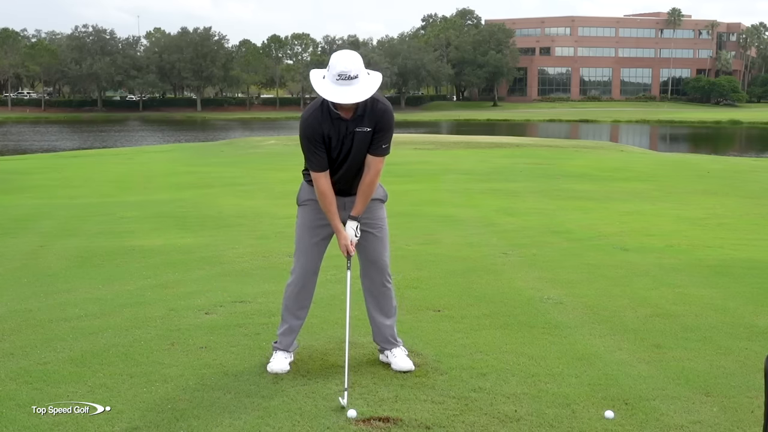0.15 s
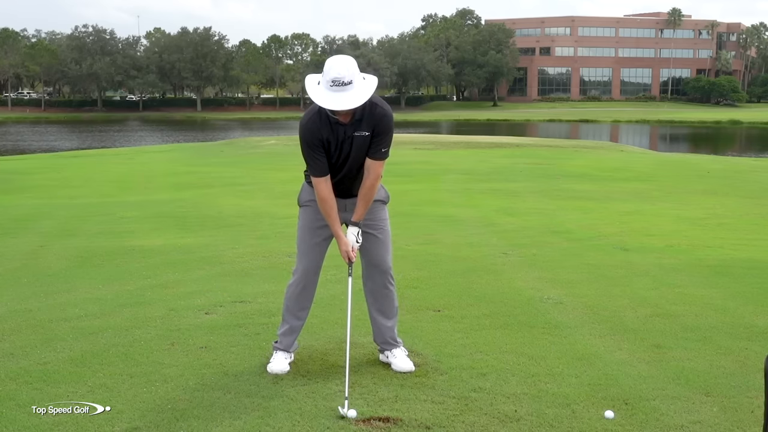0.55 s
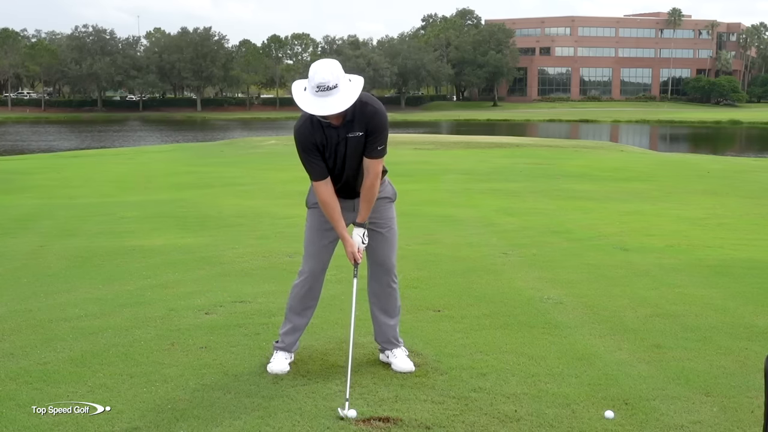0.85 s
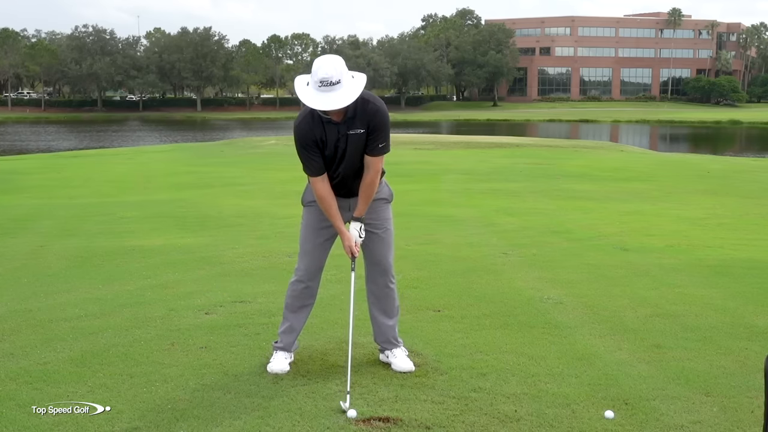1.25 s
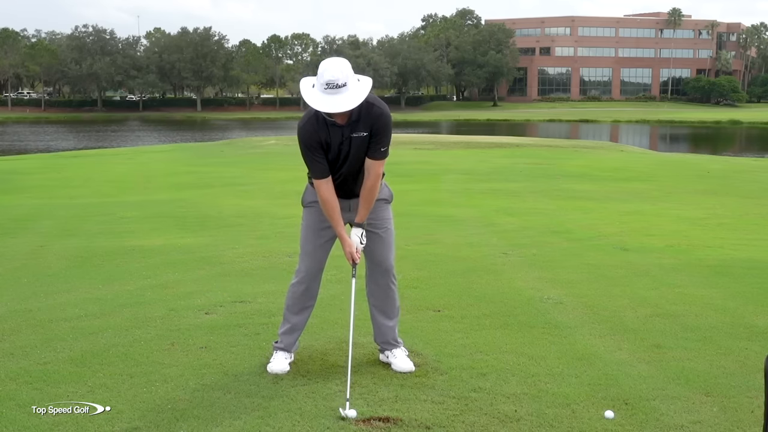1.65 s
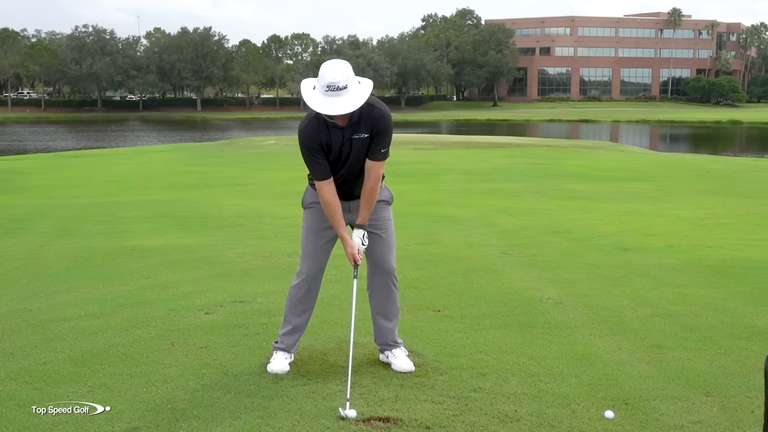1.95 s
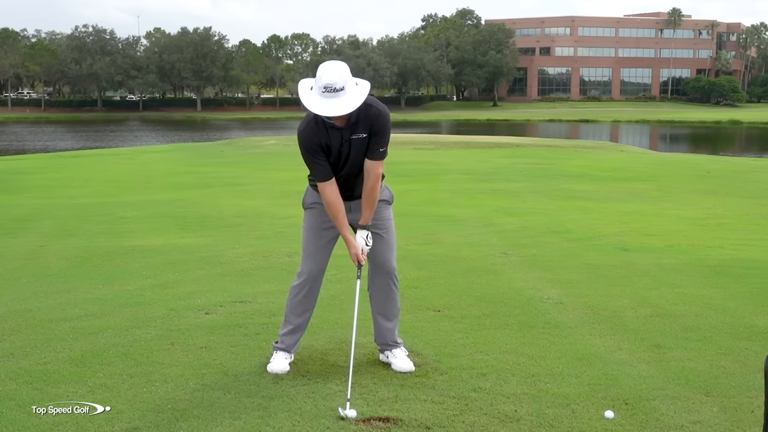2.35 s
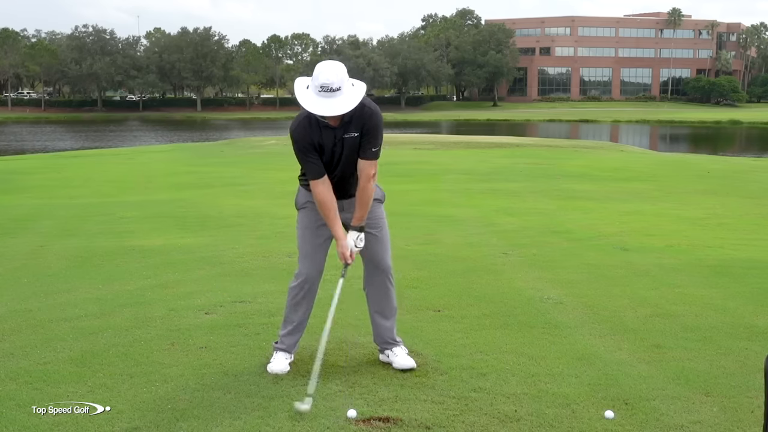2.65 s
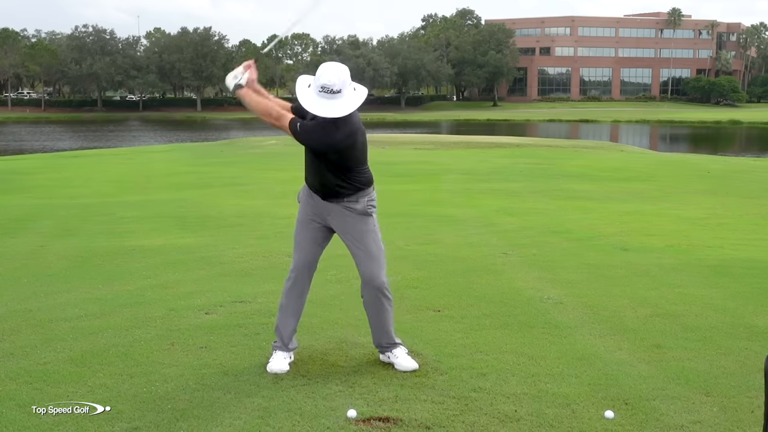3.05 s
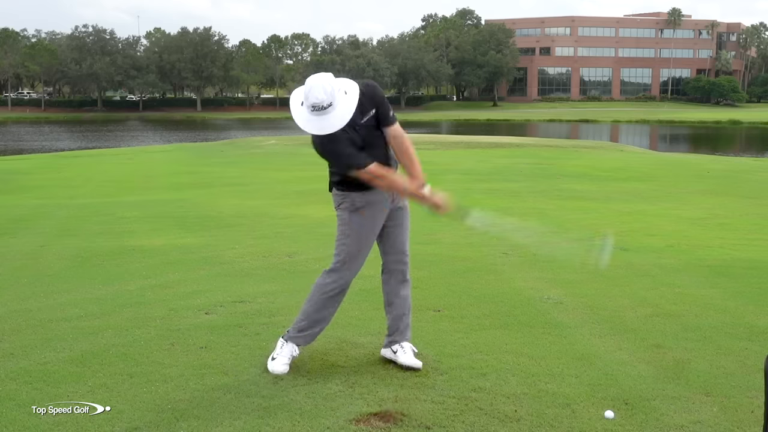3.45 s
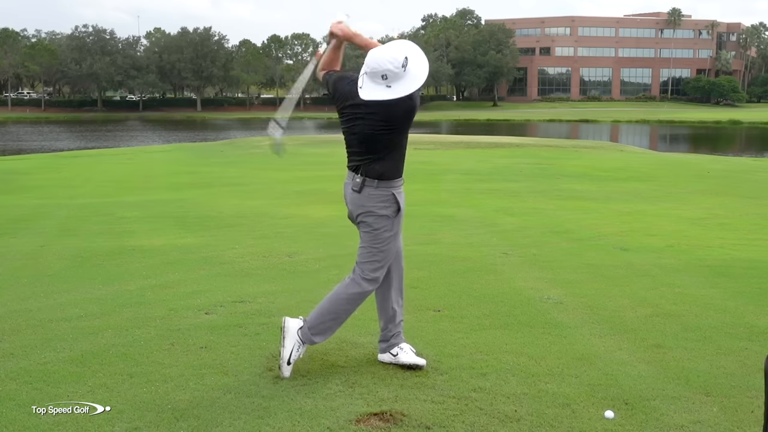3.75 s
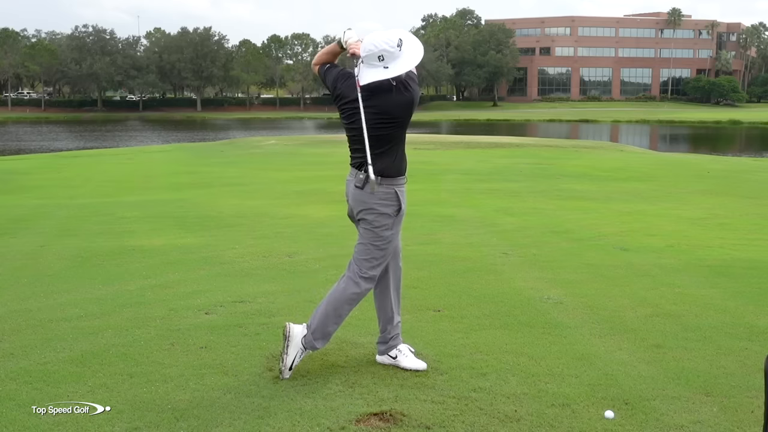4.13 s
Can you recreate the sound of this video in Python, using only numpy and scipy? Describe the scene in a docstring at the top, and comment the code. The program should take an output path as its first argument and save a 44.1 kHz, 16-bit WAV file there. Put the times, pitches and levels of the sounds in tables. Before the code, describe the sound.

Steady faint outdoor hum and small ticks, then cloth rustle, a quick rising whoosh and a sharp loud crack of an iron hitting a golf ball.

```python
"""Iron shot from an open fairway

A small microphone worn on the shirt hears an iron strike a golf ball. Far traffic hums steadily, shaped from noise;
small ticks are dying tones and puffs, and thin peeps far off are gliding narrow noise. Cloth hisses and rubs with
the swing, the sound drops out for a moment in the downswing, and the shaft whooshes as its pitch follows the speed.
Ball and head ring and crack in a burst of blows, and the microphone is buffeted and jolted in the follow-through."""
import sys
import numpy as np
from scipy import signal
from scipy.io import wavfile
from scipy.ndimage import uniform_filter1d

SR = 44100
rng = np.random.default_rng(int(sys.argv[2]) if len(sys.argv) > 2 else 0)


def unload_audio(sound):
    """Save the sound as a 16-bit wav file, at the path given as the first command line argument."""
    columns = np.transpose(np.atleast_2d(sound))
    # keep every value between -1 and 1, then stretch to whole-number steps
    steps = np.round(np.clip(columns, -1, 1) * 32767)
    wavfile.write(sys.argv[1], SR, steps.astype(np.int16))


N = 189321
TIME = np.arange(N) / SR  # s


def gain_of(db):
    """Turns decibels into an amplitude factor."""
    return 10 ** (np.asarray(db) / 20)


def evened(x):
    """Scales a sound to rms 1."""
    return x / np.sqrt(np.mean(x ** 2) + 1e-20)


def add(mix, start_s, sound):
    """Mixes a sound in at its start time, cut off at the end of the mix."""
    part = mix[round(start_s * SR):][:len(sound)]
    part += sound[:len(part)]


def noise(spectrum, patchy_db, flicker_db, size=512):
    """Coloured noise from random short-time spectra, patchy in time and pitch, with a flicker all pitches share."""
    frames = 4 * N // size + 5
    hz = np.fft.rfftfreq(size, 1 / SR)
    real, imaginary, patches = rng.standard_normal((frames, len(hz), 3)).T
    patches = uniform_filter1d(patches, size=6, axis=0)  # across pitch
    patches = evened(uniform_filter1d(patches, size=14, axis=1))  # across time
    point_hz, point_db = np.transpose(spectrum)
    colour_db = np.interp(np.log(hz + 1), np.log(point_hz), point_db, left=-90)[:, None]
    flicker = flicker_db * rng.standard_normal(frames)
    spectra = (real + 1j * imaginary) * gain_of(colour_db + patchy_db * patches + flicker)
    sound = signal.istft(spectra, nperseg=size, noverlap=3 * size // 4)[1]
    return evened(sound[:N])


def resonate(x, hz, width_hz):
    """A resonance that may move: shifts the pitch hz down to zero, smooths, and shifts back."""
    turn = np.exp(2j * np.pi * np.cumsum(hz * np.ones(len(x))) / SR)
    pole = np.exp(-np.pi * width_hz / SR)
    smoothed = signal.lfilter([1 - pole], [1, -pole], x / turn)
    return 2 * (turn * smoothed).real


def resonate_twice(x, hz, width_hz):
    """Two equal resonances in a row, for steeper skirts, scaled to rms 1."""
    return evened(resonate(resonate(x, hz, width_hz), hz, width_hz))


def level(times_s, db):
    """Gain along a curve of decibels, all but silent outside it."""
    return gain_of(np.interp(TIME, times_s, db, left=-120, right=-120))


# Far traffic and air across the open fairway. Each row: frequency in Hz, relative level in dB per Hz.
HUM_SPECTRUM = [(30, -0.5), (55, -4), (85, -6), (138, -3), (175, -10.5), (290, -17), (500, -25.5),
                (900, -27.5), (1400, -38), (2200, -41.5), (3500, -52), (6000, -56), (10000, -56.5),
                (16000, -61.5)]
HUM_DB = -44.5  # rms


def traffic():
    """A steady far hum, noise that is strongest in the bass."""
    return gain_of(HUM_DB) * noise(HUM_SPECTRUM, patchy_db=1, flicker_db=.3, size=2048)


# Small ticks of grip, cloth and grit, as the shirt microphone hears them.
# Each row: start in seconds, level in dB, pitch in Hz, noisy share from 0 to 1.
TICKS = [(.137, -49, 4500, 1), (1.315, -46, 8540, 1), (1.476, -50.5, 1510, .04), (2.146, -47.5, 2330, .7),
         (2.504, -33.5, 2000, 0.07), (2.541, -53, 4540, 0.86), (2.738, -46, 1520, .2),
         (2.746, -41, 1445, 0.22), (2.745, -44.5, 5760, 0.97), (3.536, -31, 4300, .93),
         (3.676, -30, 1320, 0.5), (3.675, -29.5, 468, .6), (4.05, -43.5, 3910, .8),
         (4.126, -32.5, 9000, 0.92), (4.127, -37.5, 2800, 0.74), (4.139, -41, 9050, .9),
         (4.14, -46, 4005, .9), (4.155, -48, 10000, .9), (4.181, -49, 4500, .9)]
TICK_T60, TICK_SHORTENING = .025, .53  # t60 in s at 1 kHz; higher ticks die sooner, by this power of pitch


def ticks():
    """Each tick blends a dying tone with a broad puff around the same pitch."""
    out = np.zeros(N)
    t = TIME[:SR // 20]
    for start_s, db, hz, noisy in TICKS:
        puff = .5 * resonate_twice(rng.standard_normal(len(t)), hz, .65 * hz)
        tone = np.sin(2 * np.pi * hz * t)
        t60 = TICK_T60 * (hz / 1000) ** -TICK_SHORTENING
        onset = np.minimum(t / .0005, 1)
        body = (1 - noisy) * tone + noisy * puff
        add(out, start_s, gain_of(db - 60 * t / t60) * onset * body)
    return out


# Thin peeps far off. Each row: start in seconds, length in seconds, first pitch in Hz, last pitch in Hz, level in dB.
PEEPS = [(1.917, .075, 7950, 8200, -83), (2.03, .03, 7300, 7200, -84), (2.49, .015, 7850, 7900, -84),
         (2.537, 0.068, 7800, 7940, -79.5), (2.633, 0.064, 6300, 6560, -82)]


def peeps():
    """Faint, slightly fuzzy gliding notes, as of a small bird far off: noise through a narrow moving resonance."""
    out = np.zeros(N)
    for start_s, length_s, from_hz, to_hz, db in PEEPS:
        air = rng.standard_normal(round(length_s * SR))
        glide_hz = np.linspace(from_hz, to_hz, len(air))
        note = evened(resonate(air, glide_hz, 90))
        add(out, start_s, gain_of(db) * note * signal.windows.tukey(len(air), .4))
    return out


# Hiss of fine fibres close to the microphone. Each row: frequency in Hz, relative level in dB per Hz.
HISS_SPECTRUM = [(800, -30), (2500, -2), (3400, 0), (6400, -4), (8000, -5), (15000, -6.5), (16500, -8)]
# Coarse rub of folds close to the microphone. Each row: frequency in Hz, relative level in dB per Hz.
RUB_SPECTRUM = [(150, 2.5), (430, 1), (970, 0), (1500, -7.5), (2400, -14.5), (3900, -23), (6000, -41.5)]
# The shirt slides as the body turns. Each row: start in seconds, rise in seconds, hold in seconds,
# fall in seconds, fine hiss in dB, coarse rub in dB.
MOVES = [(2.5, .06, .02, .1, -80, -78), (2.64, .05, 0.084, .06, -71, -63),
         (2.693, 0.18, 0.52, .06, -66.5, -62), (2.86, .06, .02, .08, -66, -70),
         (2.9, 0.11, 0.35, .05, -75, -56.5), (3.03, 0.072, .03, .1, -65.5, -59.5),
         (3.4, .12, .01, .09, -58.5, -47), (3.4, .1, 0.49, 0.1, -64.5, -66),
         (3.597, .06, 0.011, 0.1, -58, -47.5), (3.62, 0.11, 0.62, .1, -77, -52.5)]
MOVE_SWELL_DB = 19.5  # a move rises and falls through this range
# A fold snaps tight at the top of the swing.
# The one row: start in seconds, length in seconds, level in dB, pitch in Hz, width in Hz.
SCUFF = (3.292, .075, -51, 5300, 6000)


def cloth():
    """Fine fibres hiss and folds rub through each move, moves adding in power, and one fold scuffs."""
    hiss_power, rub_power = np.zeros((2, N))
    for start_s, rise, hold, fall, hiss_db, rub_db in MOVES:
        corners_s = start_s + np.cumsum([0, rise, hold, fall])
        swell_power = level(corners_s, [-MOVE_SWELL_DB, 0, 0, -MOVE_SWELL_DB]) ** 2
        hiss_power += gain_of(2 * hiss_db) * swell_power
        rub_power += gain_of(2 * rub_db) * swell_power
    out = np.sqrt(hiss_power) * noise(HISS_SPECTRUM, patchy_db=1.2, flicker_db=1.2, size=256)
    out += np.sqrt(rub_power) * noise(RUB_SPECTRUM, patchy_db=1.2, flicker_db=.7)
    start_s, length_s, db, hz, width_hz = SCUFF
    scuff = resonate_twice(rng.standard_normal(SR // 5), hz, width_hz)[:round(length_s * SR)]
    add(out, start_s, gain_of(db) * scuff * signal.windows.tukey(len(scuff), .6))
    return out


# Broad wake of the club head. Each row: frequency in Hz, relative level in dB per Hz.
WAKE_SPECTRUM = [(700, -17), (1500, -4), (2450, -3.5), (3900, -9), (6100, -15), (16000, -31)]
# Speed of the club head through the swing. Each row: time in seconds, speed in m/s.
SPEED = [(3.385, 11.7), (3.426, 17.7), (3.44, 23.6), (3.452, 29.2), (3.485, 38), (3.494, 48), (3.506, 30.5),
         (3.525, 24.4), (3.55, 21), (3.621, 15.8)]
STROUHAL, SHAFT_M = .2, .01  # vortex pitch in Hz = number x speed / thickness in m
FULL_SPEED, DB_PER_DOUBLING = 40, 19.5  # m/s; whistle and wake grow alike with speed
WHISTLE_DB, WAKE_DB = -24.5, -34  # rms at full speed


def whoosh():
    """Vortices shed by the shaft: a fuzzy whistle that rises with speed, and the broad wake of the head."""
    times_s, speed = np.transpose(SPEED)
    hz = np.interp(TIME, times_s, STROUHAL * speed / SHAFT_M)
    whistle = resonate_twice(rng.standard_normal(N), hz, 360)
    wake = noise(WAKE_SPECTRUM, patchy_db=1.5, flicker_db=1, size=256)
    rush = level(times_s, DB_PER_DOUBLING * np.log2(speed / FULL_SPEED))
    return rush * (gain_of(WHISTLE_DB) * whistle + gain_of(WAKE_DB) * wake)


# Single jolts of the shirt microphone in the follow-through.
# Each row: start in seconds, level in dB before the soft onset, pitch in Hz, t60 in seconds.
JOLTS = [(3.558, -12, 99, 0.043), (3.602, -17, 108, 0.024), (3.627, -17.5, 93, 0.0686),
         (3.688, -23.5, 130, 0.041), (3.803, -23, 92, 0.082), (3.992, -26, 135, 0.037)]
BUFFET_S, BUFFET_RISE_S = 3.515, .11  # s; strongest just after the blow, after this rise
GUST_DB, GUST_T60 = -32, .35  # a first gust, t60 in s
RUMBLE_DB, RUMBLE_T60 = -37, 1.8  # then a long rumble, t60 in s


def buffeting():
    """Low noise buffets the microphone in a gust and a long rumble, and each jolt is a soft dying thud."""
    t = np.maximum(TIME - BUFFET_S, 0)
    gust = gain_of(GUST_DB - 60 * t / GUST_T60)
    rumble = gain_of(RUMBLE_DB - 60 * t / RUMBLE_T60)
    rise = np.clip(1 + (TIME - BUFFET_S) / BUFFET_RISE_S, 0, 1)
    out = np.hypot(gust, rumble) * rise * resonate_twice(rng.standard_normal(N), 100, 150)
    t = TIME[:SR // 5]
    for start_s, db, hz, t60 in JOLTS:
        onset = 1 - np.exp(-t / .0011)
        add(out, start_s, -gain_of(db - 60 * t / t60) * onset * np.sin(2 * np.pi * hz * t))
    return out


# The ball leaves the face and the sole meets the turf, then the divot tears off in jerks.
# Each row: start in seconds, peak of the ring in dB, level of the crack in dB.
BLOWS = [(3.4911, 3, -21), (3.4933, -1.3, -10), (3.4966, -4.5, -16), (3.4998, -4.3, -23), (3.5017, -9, -28),
         (3.5067, -18.6, -37)]
# Modes of ball and club head. Each row: frequency in Hz, relative level in dB, t60 in seconds.
MODES = [(340, -9, .028), (670, -11, .022), (902, -8, .035), (1000, -3, .017), (1561, -9, .017),
         (2092, -5, .026), (2155, -7.5, .035), (2210, -1, .025), (2504, 0, .025), (2646, -7, .043),
         (3001, -10.5, .025), (3577, -11.3, .04), (4129, -9, .009), (4732, -16, .029)]
# Colour of the crack. Each row: frequency in Hz, relative level in dB per Hz.
CRACK_SPECTRUM = [(600, -20), (1500, -3), (3500, 0), (5100, -5), (7800, -3), (11600, -13), (16000, -19)]


def strike():
    """Each blow rings the modes of ball and head and throws a short crack of noise."""
    out = np.zeros(N)
    t = TIME[:SR // 10]
    ring = np.zeros(len(t))
    for k, (hz, db, t60) in enumerate(MODES):
        ring += (-1) ** k * gain_of(db - 60 * t / t60) * np.sin(2 * np.pi * hz * t)  # neighbours swing opposite
    ring /= abs(ring).max()
    grit = noise(CRACK_SPECTRUM, patchy_db=2, flicker_db=1, size=256)
    for k, (start_s, blow_db, crack_db) in enumerate(BLOWS):
        fade = gain_of(crack_db - 60 * t / .018) * np.minimum(t / .0004, 1)
        crack = fade * grit[k * len(t):][:len(t)]  # fresh noise for each blow
        rebound = (-1) ** k  # the head rebounds between blows
        add(out, start_s, rebound * gain_of(blow_db) * ring + crack)
    return out


def scene():
    """All sources at the one microphone on the shirt."""
    return (traffic() + ticks() + peeps() + cloth() + whoosh() + buffeting() + strike())[None]


# The sound drops out in the downswing.
# The one row: silent from in seconds, silent to in seconds, fall in seconds, rise in seconds.
GAP = (3.3475, 3.386, .003, .012)
LOW_CUT_HZ, EDGE_HZ = 80, 15900  # Hz
OVERLOAD = 1.05  # ceiling of the soft overload, full scale = 1


def record(dry):
    """The drop-out, a low cut that rings into the gap, soft overload, and the band limit."""
    start, end, fall, rise = GAP
    passing = np.interp(TIME, [start - fall, start, end, end + rise], [1, 0, 0, 1])
    low_cut = signal.butter(6, LOW_CUT_HZ, "high", fs=SR, output="sos")
    cut = signal.sosfilt(low_cut, dry * passing)
    bent = OVERLOAD * np.tanh(cut / OVERLOAD)
    band_limit = signal.firwin(511, EDGE_HZ, window=("kaiser", 9), fs=SR)
    return signal.oaconvolve(bent, band_limit[None], "same")


dry = scene()
out = record(dry)
unload_audio(out)
```